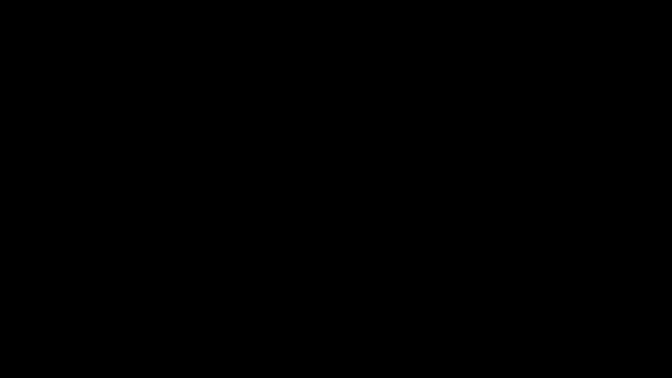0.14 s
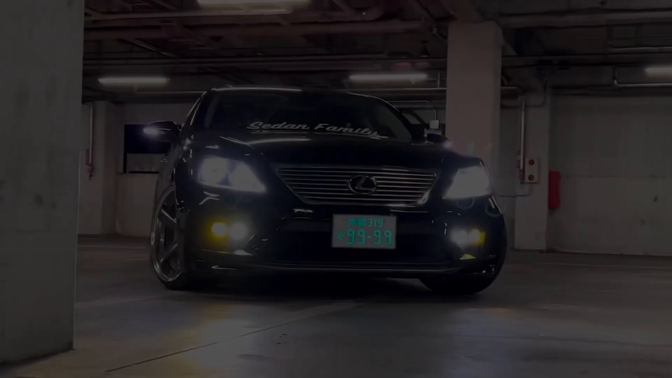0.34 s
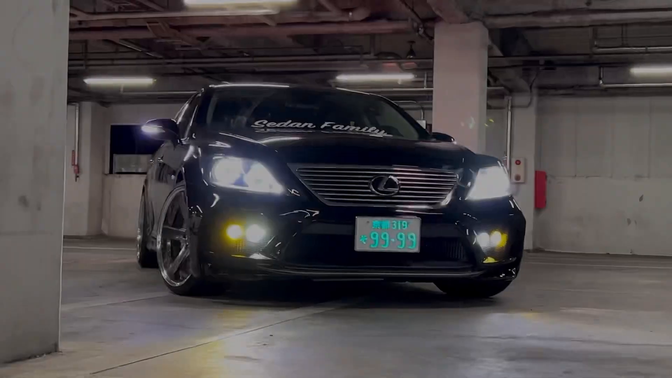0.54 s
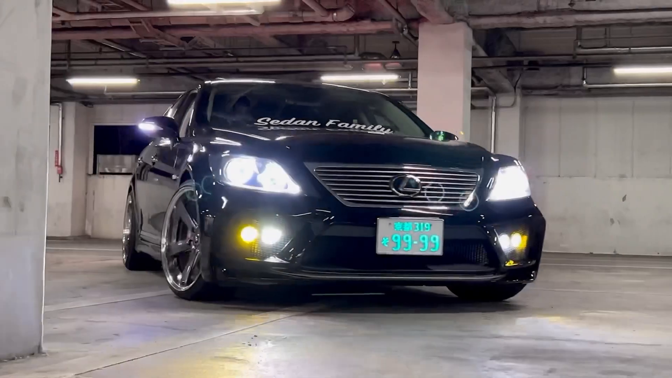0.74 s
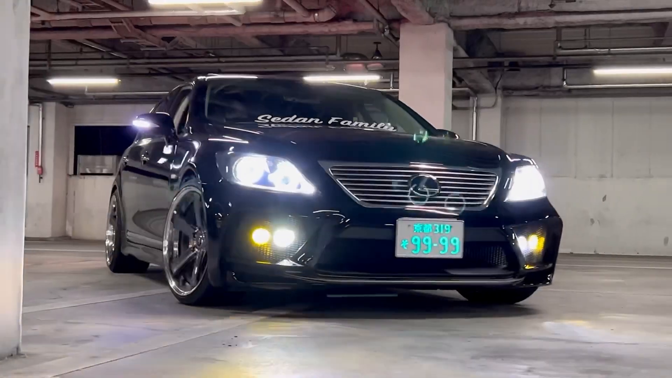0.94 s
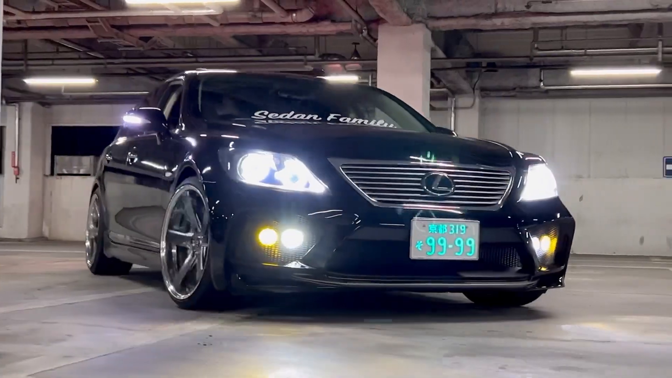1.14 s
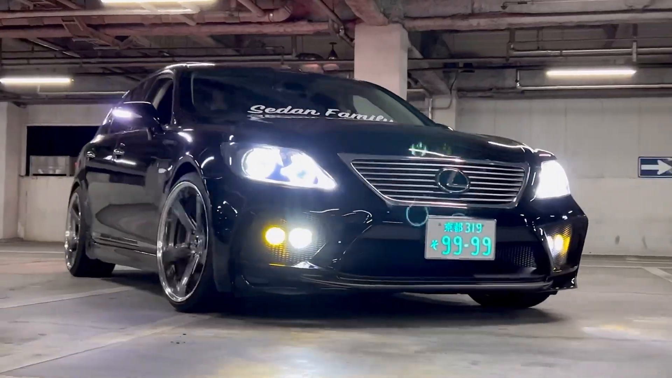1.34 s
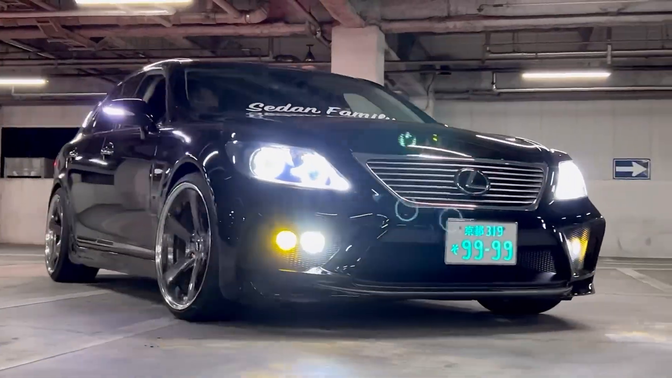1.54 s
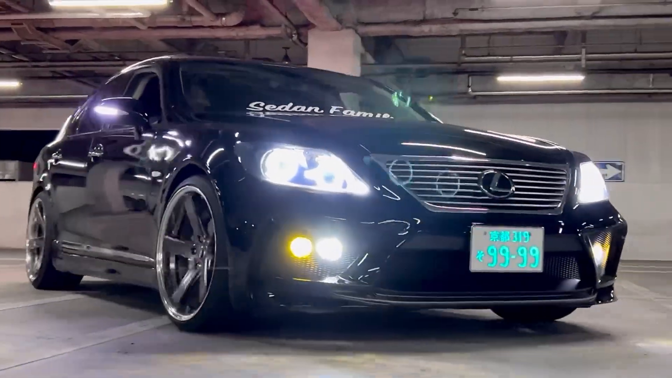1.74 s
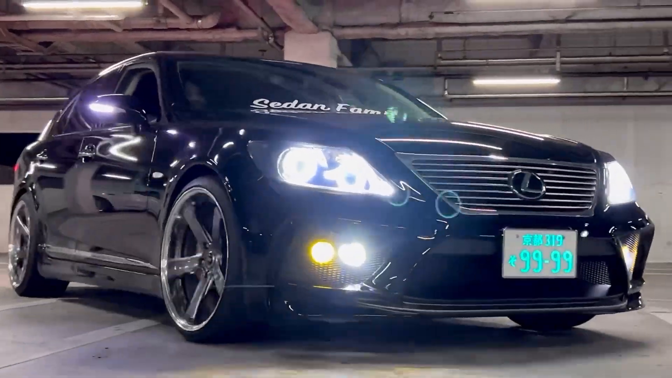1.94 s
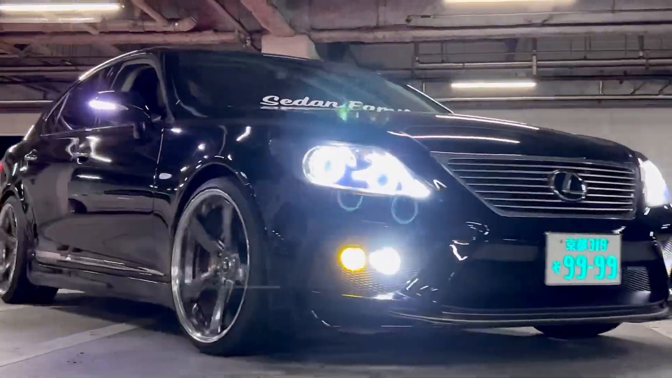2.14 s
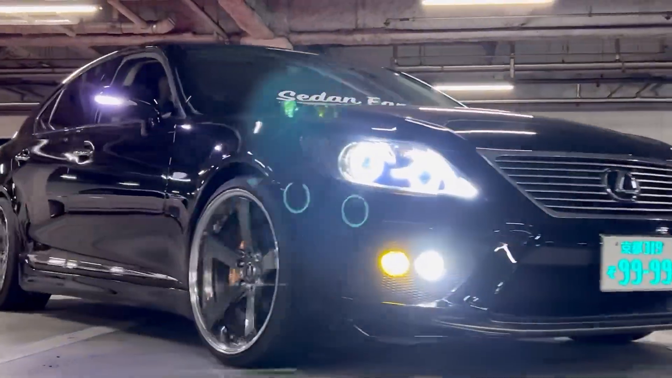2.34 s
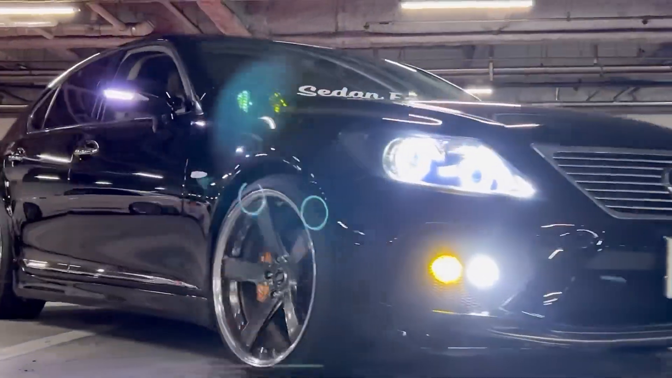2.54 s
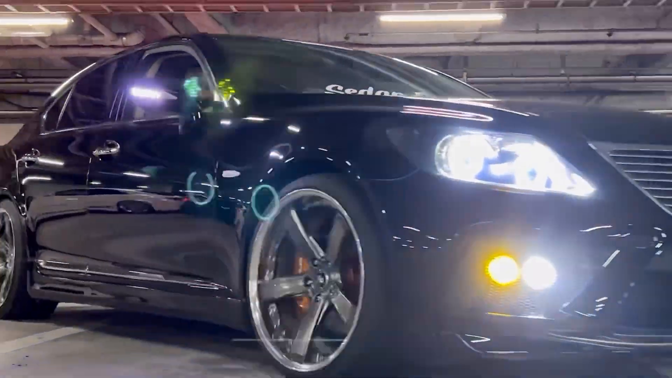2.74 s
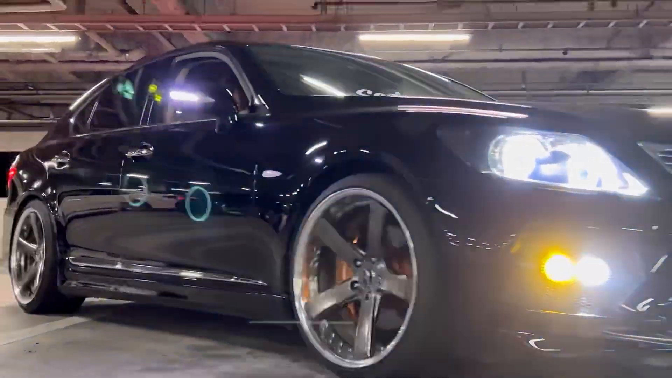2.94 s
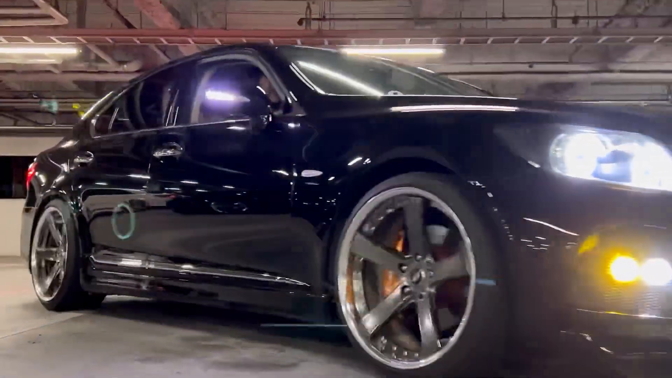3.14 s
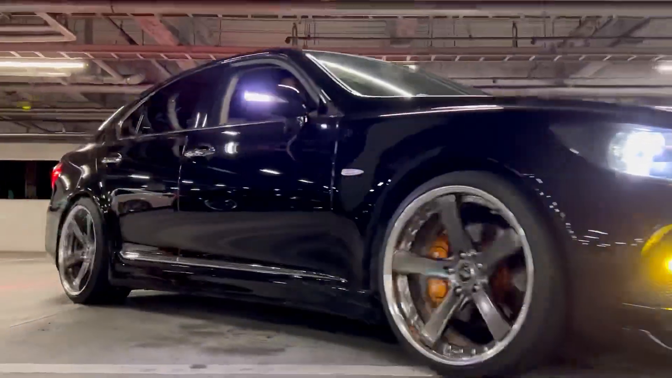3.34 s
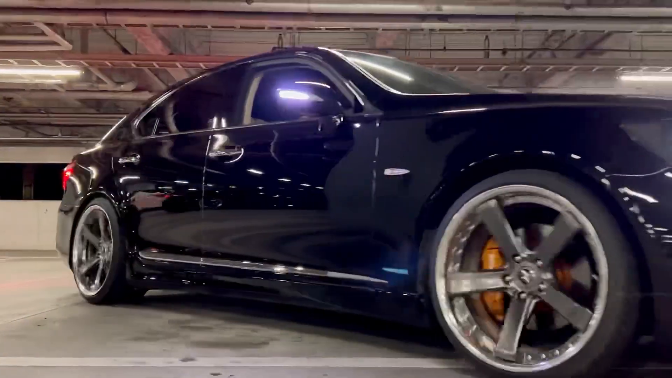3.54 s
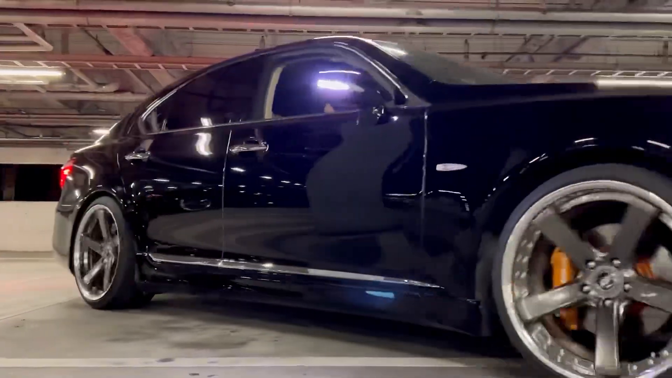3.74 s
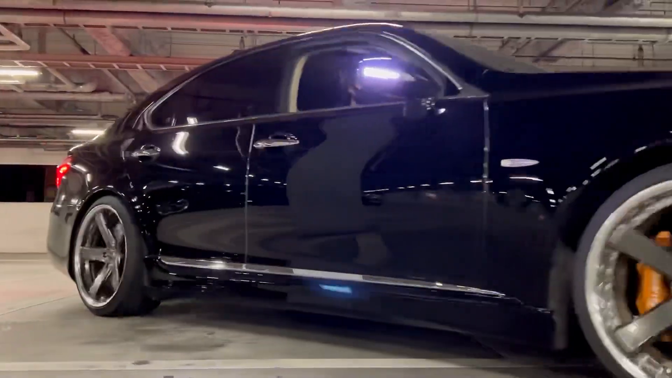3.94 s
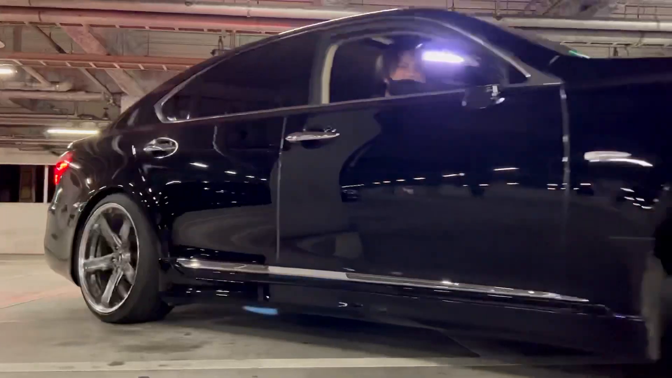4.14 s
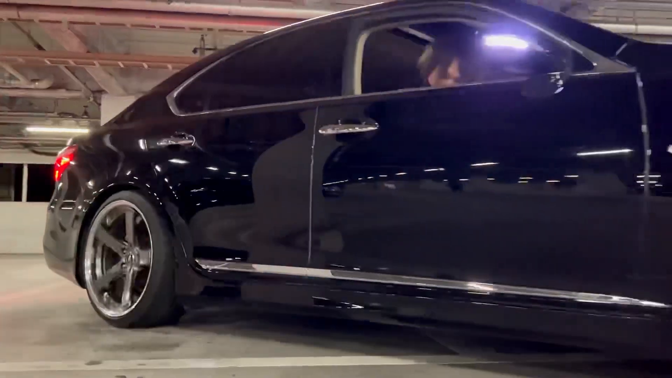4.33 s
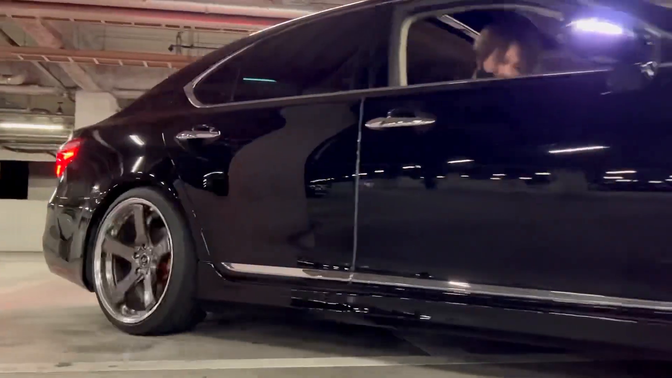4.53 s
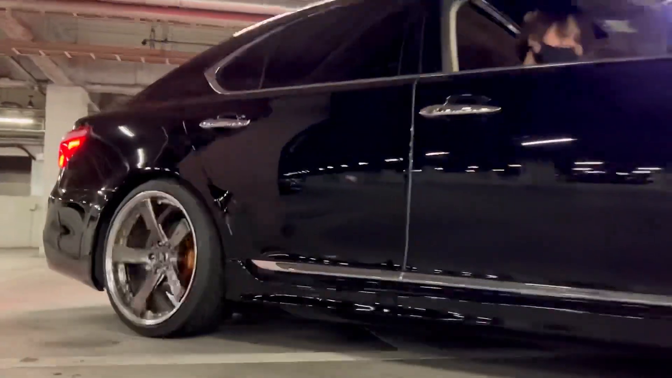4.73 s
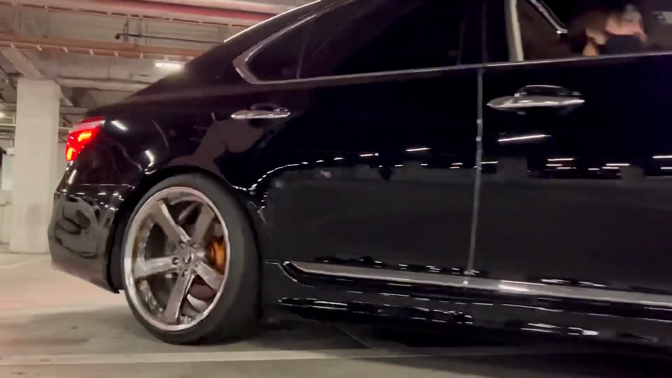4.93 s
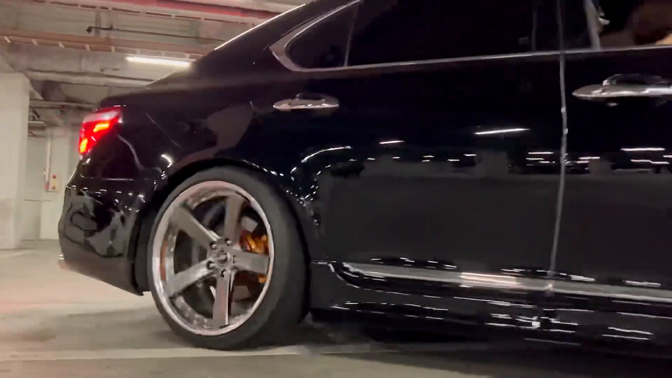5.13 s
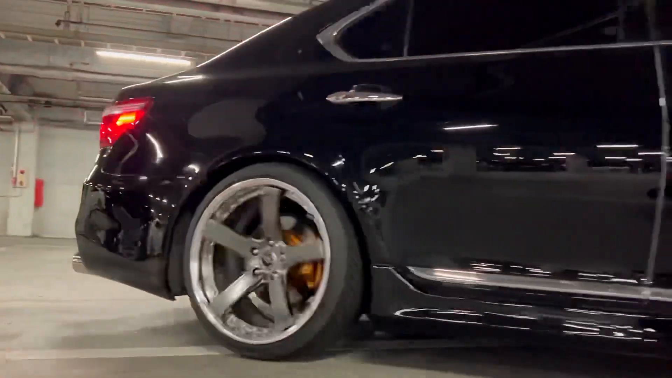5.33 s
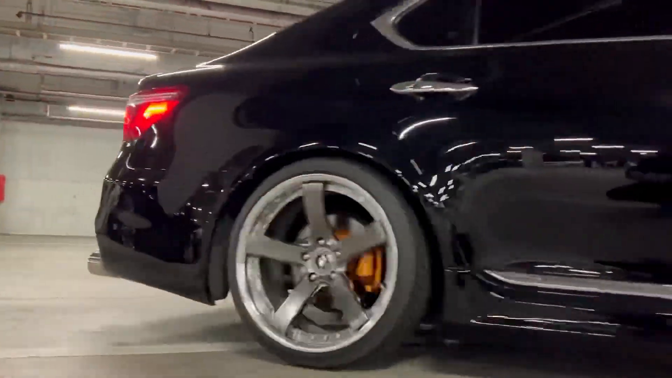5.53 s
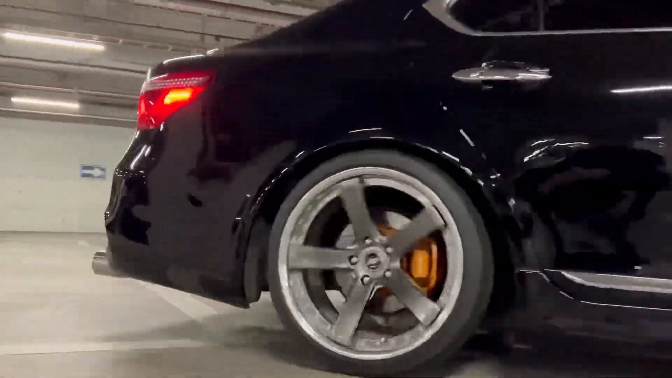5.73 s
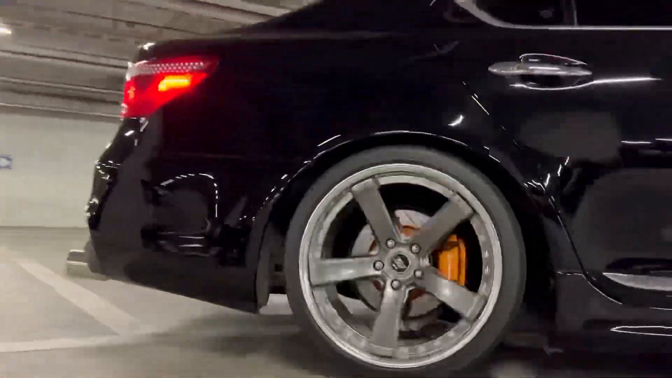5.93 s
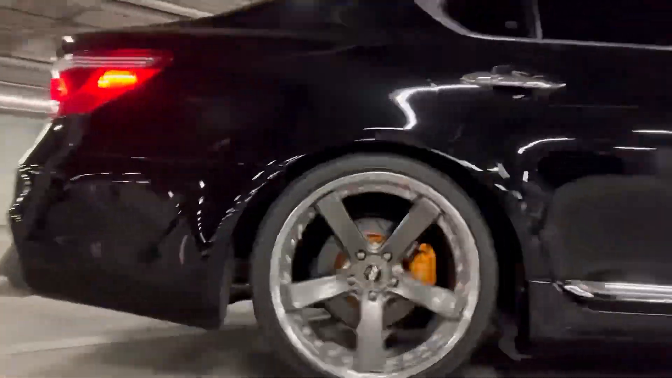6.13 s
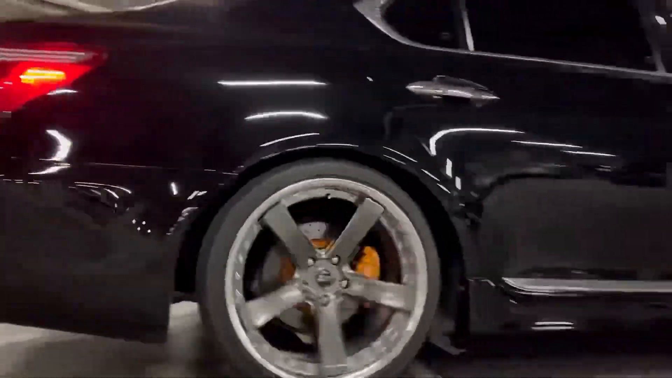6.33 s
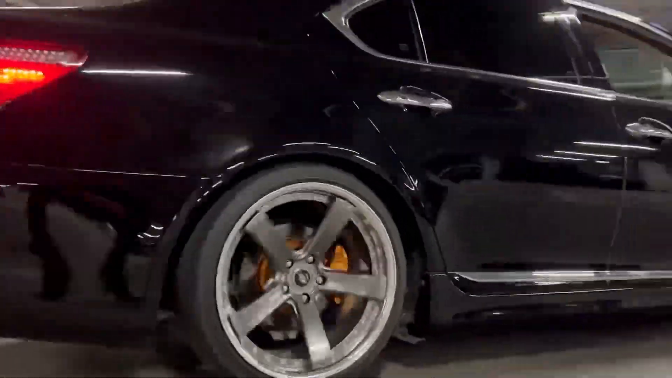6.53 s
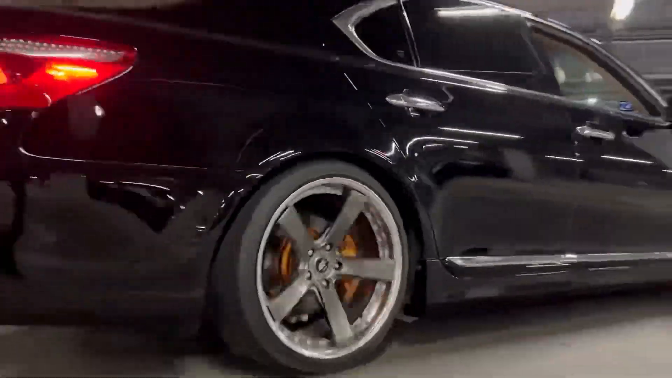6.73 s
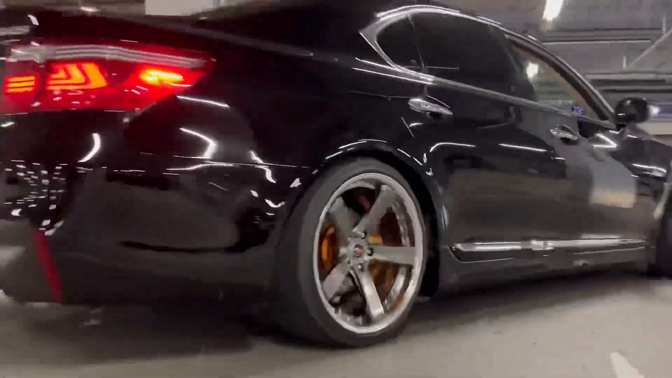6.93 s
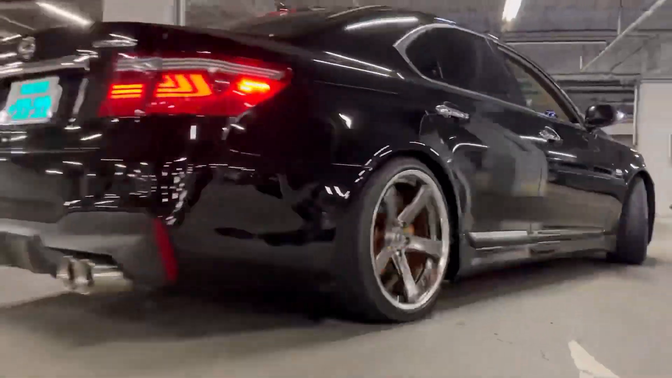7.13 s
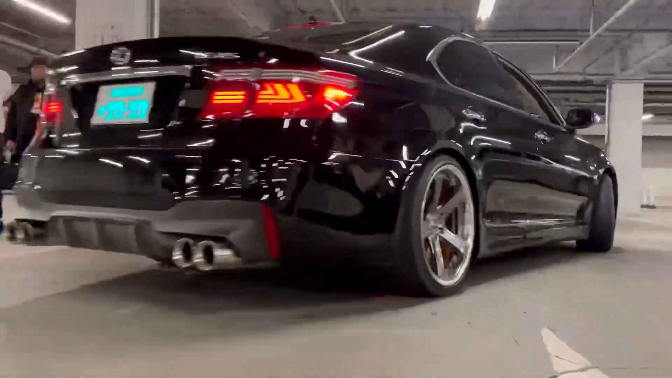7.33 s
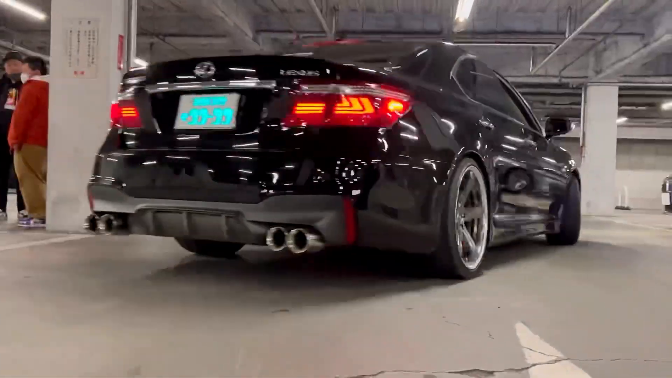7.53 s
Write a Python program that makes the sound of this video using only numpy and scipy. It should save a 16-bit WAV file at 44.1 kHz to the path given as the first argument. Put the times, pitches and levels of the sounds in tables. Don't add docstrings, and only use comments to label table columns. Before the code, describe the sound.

A large car with a throaty exhaust rolls slowly by, close to the microphone. Low, lumpy idle and soft air hiss come first; then other engines rise and fall deeper in the garage, their drones blurred by concrete. Tyres hiss and scuff, tiny stones snap, and a final loud throttle blip rings through the tail pipes.

```python
import sys
import numpy as np
from scipy import signal
from scipy.fft import rfft, irfft, next_fast_len
from scipy.io import wavfile
from scipy.ndimage import uniform_filter1d

SR = 44100
rng = np.random.default_rng(int(sys.argv[2]) if len(sys.argv) > 2 else 0)


def bounce(signal):
    frames = np.transpose(np.atleast_2d(signal))
    limited = np.clip(frames, -1, 1)
    pcm = np.round(limited * 32767).astype(np.int16)
    wavfile.write(sys.argv[1], SR, pcm)


def gain_from_decibels(decibels):
    exponent = np.asarray(decibels, float) / 20
    return 10 ** exponent


N = 338231
ARRIVE_S = .174

# time in seconds, firing rate in Hz, firing tone in dB, its octave in dB.
NEAR = [(0.17, 46.54, -45, -47), (0.28, 47.15, -57, -27.5), (0.5, 47.87, -43, -36.5),
        (0.83, 47.7, -49, -33), (1.27, 47.6, -47, -29.5), (2.3, 48, -49.5, -29), (2.49, 47.85, -44, -34),
        (2.6, 48.1, -48, -25), (3.6, 48.2, -62, -28.5), (4.03, 48.12, -37, -30.5), (4.3, 49.04, -38, -24),
        (4.75, 48.87, -44, -43.5), (5.9, 49.72, -32.5, -36), (6.57, 51.92, -23.5, -24.5),
        (6.8, 57.5, -24, -36), (7.05, 67.01, -22, -16.5), (7.3, 90.41, -19, -46), (7.67, 84.4, -26, -43)]
# time in seconds, firing rate in Hz, level in dB.
FAR = [
    [(2.35, 52.9, -56), (2.57, 68.43, -21.5), (2.85, 69.1, -28), (3.12, 69.5, -20), (3.55, 71.34, -29),
     (3.9, 76.57, -26.5), (4.01, 78.83, -38), (4.23, 86.96, -20), (4.45, 87.27, -26)],
    [(4.15, 59.5, -56), (4.27, 62.3, -28), (4.55, 68.18, -25), (4.84, 78.22, -26.5), (4.96, 81.8, -27),
     (5.19, 96.37, -24), (5.54, 108.6, -21), (5.77, 118.5, -32.5), (6.0, 99.2, -25)],
    [(5.15, 57.4, -53), (5.35, 63.12, -28.5), (5.61, 65.48, -25.5), (5.84, 68.75, -26.5),
     (5.95, 64.1, -21.5), (6.18, 58.47, -35), (6.45, 62.58, -25.5), (6.75, 60.5, -39)],
]
# time in seconds, effort in dB.
EXHAUST = [(0.0, -52), (0.13, -60), (0.19, -44.5), (2.35, -43.5), (2.56, -34.5), (3.5, -35.5), (3.98, -35),
           (4.14, -28.5), (4.45, -27), (4.98, -28.5), (5.4, -27.5), (6.06, -28), (6.64, -31), (6.85, -32),
           (7.0, -27), (7.2, -18.5), (7.45, -21), (7.67, -31)]
# time in seconds, level in dB.
RUSH = [(0.0, -5.5), (0.13, -8.5), (0.19, -2.5), (1.5, -1), (3.2, 1.45), (3.6, 2.5), (4.2, 1.7), (4.5, 3.5),
        (5.1, .6), (5.95, 3.5), (6.15, 1.1), (6.7, 0.1), (7.67, 0)]


def evened(x):
    return x / np.sqrt(np.mean(x ** 2) + 1e-20)


def curves(rows, t):
    s, *columns = np.transpose(rows)
    return [np.interp(t, s, c) for c in columns]


def colour(x, points):
    size = next_fast_len(N)
    f, db = np.transpose(points)
    pitch = np.log(np.fft.rfftfreq(size, 1 / SR) + 1)
    gain = gain_from_decibels(np.interp(pitch, np.log(f + 1), db))
    return irfft(rfft(x, size) * gain, size)[..., :N]


def drift(hz):
    knots = rng.standard_normal(int(N / SR * 80))
    return np.interp(np.arange(N) / SR * min(hz, 79), np.arange(len(knots)), knots)


def swell(t, s, length):
    return np.cos(np.pi * np.clip((t - s) / length, -.5, .5)) ** 2


def window(rows, t):
    return np.clip(np.minimum(t - rows[0][0], rows[-1][0] - t) / 0.013, 0, 1)


def sudden(t):
    return np.interp(t, [0, .13, ARRIVE_S - .004, ARRIVE_S + .008, .19, 8], [0, .13, .13, .19, .19, 8])


def echoes(t60):
    at = np.arange(0, SR - 22, 22)
    taps = np.zeros(SR)
    signs = rng.choice([-1., 1.], len(at))
    taps[at + rng.integers(0, 22, len(at))] = signs * gain_from_decibels(-60 * at / SR / t60)
    return taps / np.linalg.norm(taps)


def tone(hz, db, wobble):
    flutter_db = .9 * drift(24)
    turns = np.cumsum(hz * (1 + wobble * drift(16))) / SR
    return np.sqrt(2) * gain_from_decibels(db + flutter_db) * np.sin(2 * np.pi * turns)


def distant_motor(t):
    # pitch in Hz, level in dB.
    whine = [(559.9, -59.5)]
    fade = np.clip((ARRIVE_S - t) / 0.015, 0, 1)
    return sum(tone(hz, db, 0.0038) for hz, db in whine) * fade


def fans(t):
    # pitch in Hz, level in dB per Hz.
    fan_colour = [(260, -1), (450, -3), (620, -5), (800, -7.5), (1050, -9), (1250, -8.5), (1500, -12),
                  (2000, -11), (2350, -15.5), (2700, -20), (4500, -63)]
    # centre in seconds, length in seconds, rise in dB.
    gusts = [
        (0.212, 0.13, 4.5),
        (0.998, 0.072, 5),
        (4.67, .08, 3),
        (6.04, .15, 3),
        (6.828, .1, 4),
        (7.423, 0.28, 3.5),
        (7.68, .06, 9),
    ]
    near_db, = curves(RUSH, sudden(t))
    effort_db = curves(EXHAUST, sudden(t))[0] + 35
    gust_db = sum(db * swell(t, s, length) for s, length, db in gusts)
    fan_db = -53. + 0.57 * near_db + 0.14 * effort_db + gust_db
    hiss = colour(rng.standard_normal(N) * gain_from_decibels(.5 * drift(30)), fan_colour)
    return gain_from_decibels(fan_db + 4.5) * evened(hiss)


def tyres(t):
    # pitch in Hz, level in dB per Hz.
    tyre_colour = [(1700, -17), (2800, 4), (3500, 2), (5000, 0), (6700, -1.5), (7600, -4.5), (8800, -5.5),
                   (11500, -7.5), (12500, -6), (15200, -27)]
    # time in seconds, brightness from 0 to 1.
    bright = [(0, 0), (3.1, 0.4), (3.6, .95), (4.6, 0.8), (5.4, 0.3), (7.67, 0.1)]
    # pitch in Hz, level in dB.
    sheen = [(2000, -5), (5000, 0), (9000, 3.3), (12000, 6)]
    near_db, = curves(RUSH, sudden(t))
    grain_size = gain_from_decibels(3.0 * np.minimum(rng.exponential(1, N), 2))
    grains = grain_size * (rng.random(N) < 2500 / SR) * rng.standard_normal(N)
    hiss = rng.standard_normal(N) * gain_from_decibels(.5 * drift(40))
    tread = colour(hiss + .17 * evened(grains), tyre_colour)
    passing = np.clip(curves(bright, t)[0], 0, 1)
    tread = (1 - passing) * tread + passing * colour(tread, sheen)
    return gain_from_decibels(-66. + near_db + 7.0) * evened(tread)


def scrubs(t):
    # centre in seconds, length in seconds, level in dB.
    scuffs = [
        (1.748, 0.25, -61),
        (5.998, 0.3, -53),
        (6.823, 0.18, -52),
        (7.066, 0.12, -61),
    ]
    # pitch in Hz, level in dB.
    scuff_colour = [(1200, -28), (2000, 2), (3500, -0.5), (5500, 1.5), (7500, -2.5), (9500, -31)]
    strength = sum(gain_from_decibels(db) * swell(t, s, length) for s, length, db in scuffs)
    return strength * evened(colour(rng.standard_normal(N), scuff_colour))


def intake_rasp(t):
    # centre in seconds, length in seconds, pitch in Hz, level in dB.
    s, length, hz, db = (4.52, .7, 1950, -58)
    band = [(hz / 1.6, -40), (hz / 1.15, -3), (hz, 0), (hz * 1.15, -3), (hz * 1.6, -40)]
    return gain_from_decibels(db) * swell(t, s, length) * evened(colour(rng.standard_normal(N), band))


def grit():
    # time in seconds, peak in dB, knock in Hz, crack in Hz, left minus right in dB.
    stones = [
        (4.665, -38, 5950, 7800, -6.5),
        (6.015, -22, 6400, 9033, 7),
        (7.5499, -22, 5560, 7160, -12),
    ]
    out, t = np.zeros((2, N + 400)), np.arange(400) / SR
    for s, db, knock_hz, crack_hz, pan in stones:
        parts = [(2550, .33, .0005), (knock_hz, .75, .0003),
                 (crack_hz, .95, .00027), (1.29 * crack_hz, .65, .00022)]
        crack = sum(g * np.sin(2 * np.pi * hz * t) * t / fade * np.exp(1 - t / fade) for hz, g, fade in parts)
        start = round(s * SR)
        sides = gain_from_decibels(db + np.array([[pan], [-pan]]) / 2)
        out[:, start:start + 400] += sides * crack / abs(crack).max()
    return out[:, :N]


def far_tones(t):
    return sum(gain_from_decibels(0.5) * tone(*curves(rows, t), 0.005) * window(rows, t) for rows in FAR)


def held_engine(t):
    # time in seconds, pitch in Hz, effort in dB.
    held = [(4.2, 110.8, -39), (4.44, 121, -28), (4.69, 123.9, -31.5), (4.9, 126.2, -40.5),
            (5.05, 138.3, -52)]
    # multiple of the pitch, level in dB.
    multiples = [(0.95, 0.1), (2, 0.99), (8 / 3, -10), (3, -10.5), (10 / 3, -5.5), (11 / 3, -12.5),
                 (4, -13)]
    hz, effort_db = curves(held, t)
    return window(held, t) * sum(tone(k * hz, effort_db + db, 0.00238) for k, db in multiples)


def drones(t):
    # start in seconds, end in seconds, first pitch in Hz, last pitch in Hz, peak in dB.
    swells = [(1.55, 2.508, 227, 230.4, -45.5), (2.35, 2.767, 115.2, 115, -26),
              (2.353, 2.7, 157, 159.4, -34), (2.803, 3.8, 115.4, 114.4, -28),
              (3.199, 3.79, 81.8, 82.1, -22.5), (3.609, 4.16, 164.8, 175.3, -34.5),
              (4.102, 4.605, 158.5, 170, -25.5), (4.557, 5.066, 168.5, 181.2, -23),
              (3.843, 4.458, 244, 296.6, -38), (5.147, 5.696, 364.3, 400, -36),
              (6.8, 7.404, 226.3, 231.8, -25.5), (6.834, 7.15, 315.7, 324.2, -31),
              (7.15, 7.605, 122.4, 125, -25.5)]
    out = np.zeros(N)
    for start, end, first_hz, last_hz, db in swells:
        glide = np.interp(t, [start, end], [first_hz, last_hz])
        shape = swell(t, (start + end) / 2, end - start) ** 0.52
        out += tone(glide, db, 0.003) * shape
    return out


def lope(t):
    # time in seconds, pitch in Hz, level in dB.
    idle_drone = [(.17, 136.5, -34.5), (1.3, 134.1, -37), (2.3, 133.3, -52)]
    beat = np.sqrt(2) * np.cos(np.pi * (t - .19) / .174)
    return tone(*curves(idle_drone, t), 0.0025) * window(idle_drone, t) * beat


def near_tones(t):
    hz, first_db, second_db = curves(NEAR, t)
    both = tone(hz, first_db + 3.5, 0.009) + tone(2 * hz, second_db + 0.5, 0.0043)
    return both * np.clip((t - ARRIVE_S) / 0.0074, 0, 1)


def firings(hz, uneven_db, pattern, lead_s):
    cylinders_db = [5.5, -19.5, -11, -6.5, 3, -16.5, -11.5, -8]
    turns = np.cumsum(hz) / SR
    count = np.floor(turns - turns[round(lead_s * SR)]).astype(int)
    luck = rng.standard_normal(1500)[count]
    strength = gain_from_decibels(pattern * np.array(cylinders_db)[count % 8] + uneven_db * luck)
    puffs = strength * (np.diff(count, prepend=count[0]) > 0)
    return evened(puffs - uniform_filter1d(puffs, 4000))


def far_puffs(t):
    far = sum(firings(curves(rows, t)[0], 3.0, .6, 3.0) * window(rows, t) for rows in FAR)
    echoed = signal.oaconvolve(far, echoes(0.62))[:N]
    far = 0.27 * far + 0.37 * echoed + .5 * rng.standard_normal(N)
    return far / np.sqrt(uniform_filter1d(far ** 2, 20000))


def near_puffs(t):
    near = firings(curves(NEAR, t)[0] * (1 + .02 * drift(30)), 2.2, .8, 7.312)
    return 0.32 * near + .5 * signal.oaconvolve(near, echoes(0.44))[:N]


def pipe(x):
    # pitch in Hz, width in Hz (wider dies sooner), level in dB.
    rings = [(226.7, 11.3, 2), (290, 5.1, -7), (328, 21.3, 0), (392, 38, -10.5), (488, 67, -12.5)]
    t = np.arange(6000) / SR
    ring = sum(gain_from_decibels(db) * w * np.exp(-np.pi * w * t) * np.sin(2 * np.pi * hz * t) for hz, w, db in rings)
    ring = ring * (1 - np.exp(-t / 0.0021))
    blunt = signal.butter(3, 600, fs=SR, output="sos")
    return signal.sosfilt(blunt, signal.oaconvolve(x, ring)[:N])


def blip_booms(t):
    # centre in seconds, peak in dB, pitch in Hz, length in seconds.
    booms = [
        (7.184, -12, 330, 0.044),
        (7.229, -6.5, 324, 0.023),
        (7.316, -8, 326, 0.024),
        (7.41, -18.5, 310, 0.04),
        (7.501, -21.5, 319, 0.061),
        (7.588, -29.5, 328, 0.13),
    ]
    return sum(gain_from_decibels(db) * swell(t, s, length) * np.cos(2 * np.pi * hz * (t - s)) for s, db, hz, length in booms)


def exhaust(t):
    # time in seconds, near engine's part from 0 to 1.
    near_part = [(0, 0.48), (2.3, 0.65), (2.5, 0.04), (4.1, 0.41), (4.3, 0), (6.0, 0.28), (6.7, 0.58),
                 (6.95, 0.44), (7.67, 0.53)]
    # pitch in Hz, level in dB.
    rumble_colour = [(25, -50), (42, -16), (60, 2), (100, 7), (122, 0.5), (136, 1), (150, -4), (175, -8.5),
                     (200, -16.5), (260, -55)]
    # pitch in Hz, level in dB.
    garage_colour = [(130, -4), (170, -3), (230, 0), (280, 0), (335, -1), (400, 2.5), (470, -6.5),
                     (600, -21.5), (800, -30), (1500, -88)]
    bark_db, = curves(EXHAUST, sudden(t))
    revving_hz = np.maximum(curves(NEAR, t)[0] - 47.6, 0)
    rumble_db = -30.5 + 0.67 * (bark_db + 36) - .4 * revving_hz
    near, far = near_puffs(t), far_puffs(t)
    share = np.clip(curves(near_part, t)[0], 0, 1)
    near_gain, far_gain = np.sqrt(share), np.sqrt(1 - share)
    rumble = near_gain * evened(colour(near, rumble_colour)) + far_gain * evened(colour(far, rumble_colour))
    bark = near_gain * evened(pipe(near)) + far_gain * evened(colour(far, garage_colour))
    return gain_from_decibels(rumble_db) * rumble + gain_from_decibels(bark_db - 2.0) * bark + blip_booms(t)


def scene():
    # centre in seconds, length in seconds, depth in dB.
    lulls = [
        (.8, 0.19, -4.5),
        (1.105, 0.11, -9),
        (2.385, .08, -2.5),
        (4.981, 0.13, -6),
        (5.79, 0.18, -7),
        (6.701, 0.19, -11.5),
    ]
    # pitch in Hz, left-right difference against the sum in dB.
    wide = [(60, -28), (120, -16.5), (240, -8), (480, -2.5), (950, -1), (1890, -3), (3770, -1.7),
            (7520, -2), (15000, 0)]
    # time in seconds, level in dB.
    spread = [(0, -2.5), (2.3, -5), (2.5, -2), (4.2, 2.5), (6.2, 1.5), (6.9, -2), (7.67, -3)]
    t = np.arange(N) / SR
    lull_db = sum(db * swell(t, s, length) for s, length, db in lulls)
    tones = near_tones(t) + far_tones(t) + drones(t) + held_engine(t) + lope(t)
    engines = tones * gain_from_decibels(lull_db) + exhaust(t) * gain_from_decibels(0.14 * lull_db)
    air = fans(t) + tyres(t) + scrubs(t) + intake_rasp(t) + distant_motor(t)
    late = signal.hilbert(engines, next_fast_len(N))[:N].imag
    echoed = signal.oaconvolve(0.54 * engines + 1.0 * air, echoes(0.48))[:N]
    side = colour(0.86 * late + echoed, wide) * gain_from_decibels(curves(spread, t)[0])
    return np.array([engines + air + side, engines + air - side]) + grit()


def mid_share(hz, t):
    # pitch in Hz, share of the time silent from 0 to 1.
    gaps = [(9400, 0), (9800, .35), (10100, .85), (10300, .99), (10850, .99), (11000, 0), (12000, .05),
            (12500, .45), (13100, .85), (13600, .99), (14400, .994), (14500, .22), (15650, .22),
            (15800, .996)]
    busy = np.interp(t, (4.0, 4.6), [0, 1])
    return curves(gaps, hz)[0] + .2 * busy * (hz > 11800)


def side_share(hz, t):
    # pitch in Hz, share silent during the mono-treble stretch, share silent at all other times (0 to
    gaps = [(1300, 0, 0), (1600, .6, 0), (2000, .97, 0), (2700, .95, 0), (2900, .7, 0), (3400, .75, 0),
            (3600, .998, 0), (7550, .998, 0), (7700, .6, 0), (8200, .7, .05), (8400, .9, .75),
            (8900, .9, .7), (9200, .05, .2), (11700, 0, 0), (11900, .99, .99), (13200, .99, .99),
            (13400, .4, .5), (15000, .4, .5), (15200, .998, .998)]
    # start, end for pitches up to 1500 Hz, end for pitches from 5000 Hz, all in seconds.
    start, loosens, ends = (.17, 3.0, 3.3)
    mono_silent, usual_silent = curves(gaps, hz)
    mono_stretch = (t > start) & (t < np.interp(hz, [1500, 5000], [loosens, ends]))
    return np.where(mono_stretch, mono_silent, usual_silent)


def blanked(x, share):
    hz, t, z = signal.stft(x, SR, nperseg=1024)
    bands = (abs(z[:512]) ** 2).reshape(64, 8, -1).sum(1)
    power = uniform_filter1d(bands, size=2, axis=1)
    capped = np.minimum(power, 4 * np.median(power, axis=1, keepdims=True))
    dip = power / uniform_filter1d(capped, size=24, axis=1)
    rank = dip.argsort(1).argsort(1) / dip.shape[1]
    z[:512] *= np.repeat(rank >= share(hz[4:512:8, None], t), 8, axis=0)
    return signal.istft(z, SR, nperseg=1024)[1][:N]


def thinned(x):
    mid = blanked(x.mean(0), mid_share)
    side = blanked((x[0] - x[1]) / 2, side_share)
    return np.array([mid + side, mid - side])


def roll_off(x):
    return signal.sosfilt(signal.butter(12, 17100, fs=SR, output="sos"), x)


def record(dry):
    ceiling = .59
    excess = dry - np.clip(dry, -ceiling, ceiling)
    rounding = signal.butter(2, 1200, fs=SR, output="sos")
    held = dry - signal.sosfiltfilt(rounding, excess)
    return roll_off(thinned(held))


dry = scene()
out = record(dry)
bounce(out)
```